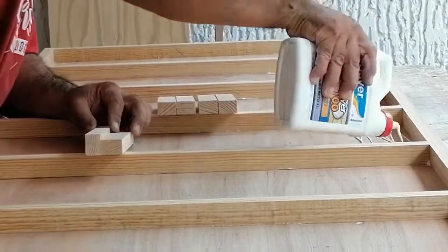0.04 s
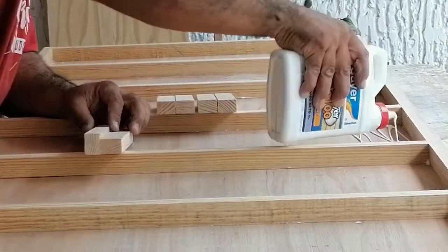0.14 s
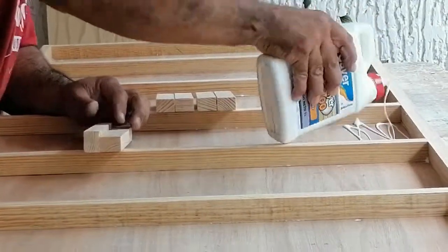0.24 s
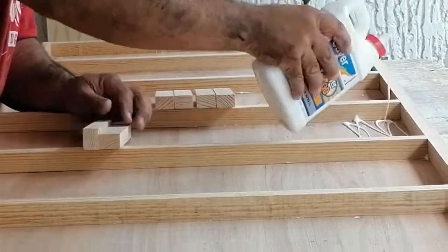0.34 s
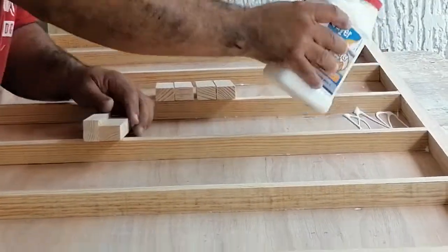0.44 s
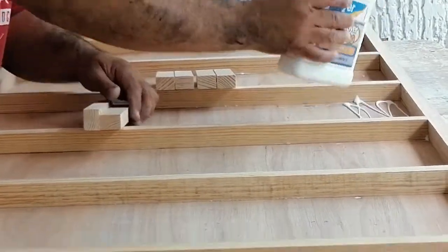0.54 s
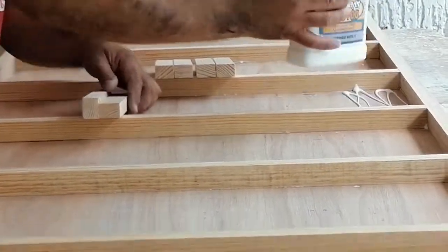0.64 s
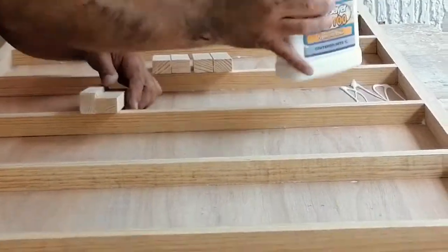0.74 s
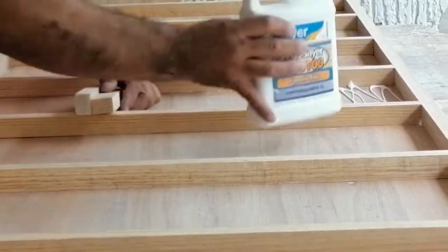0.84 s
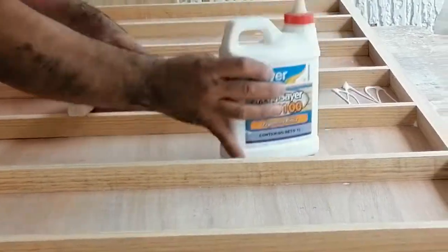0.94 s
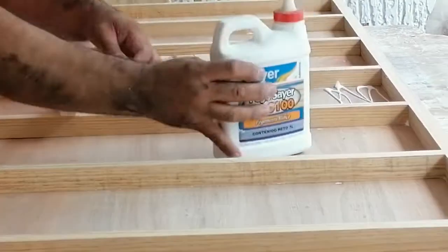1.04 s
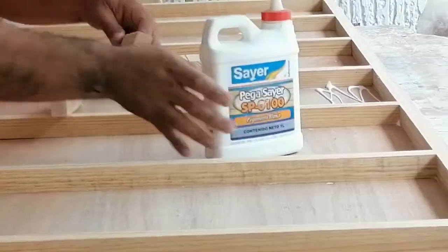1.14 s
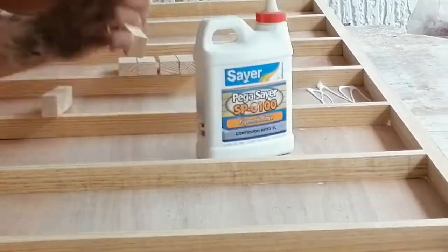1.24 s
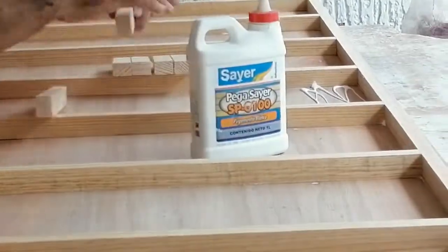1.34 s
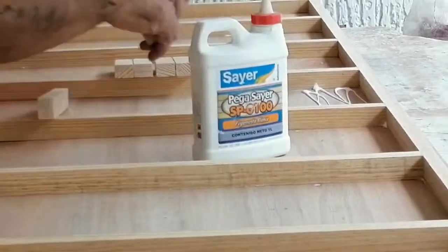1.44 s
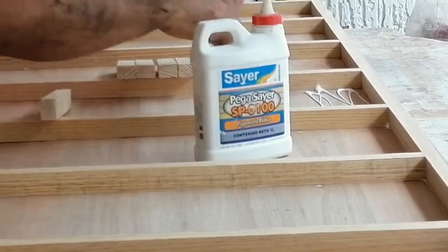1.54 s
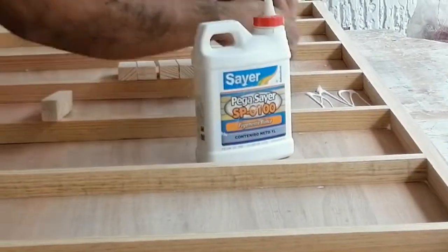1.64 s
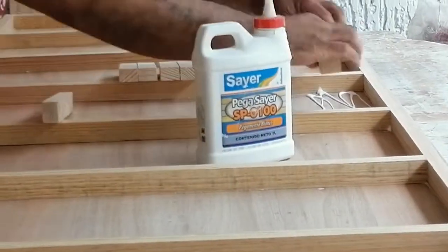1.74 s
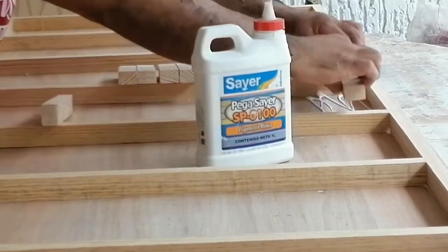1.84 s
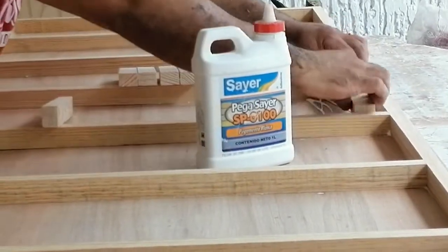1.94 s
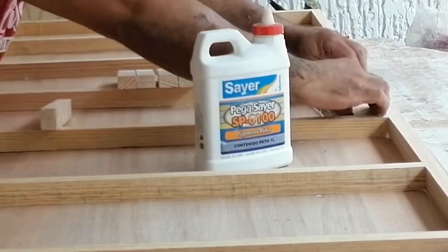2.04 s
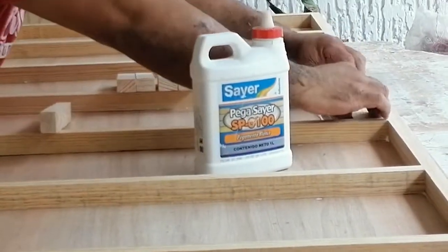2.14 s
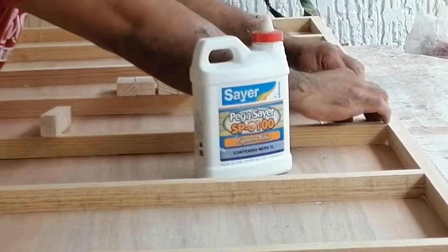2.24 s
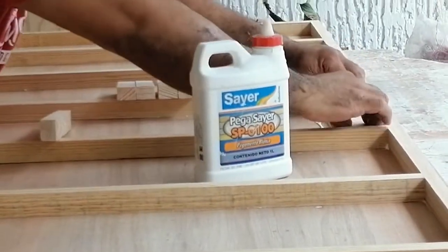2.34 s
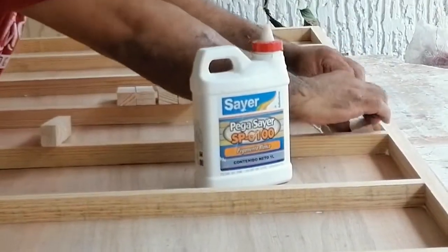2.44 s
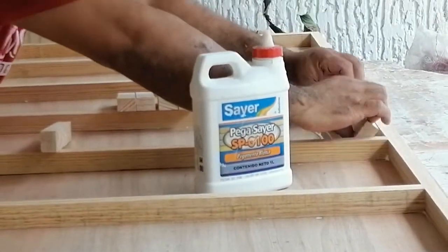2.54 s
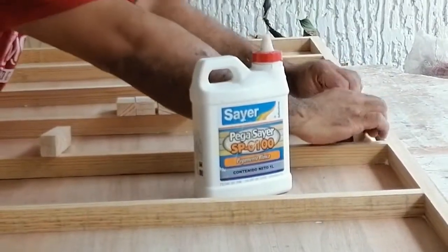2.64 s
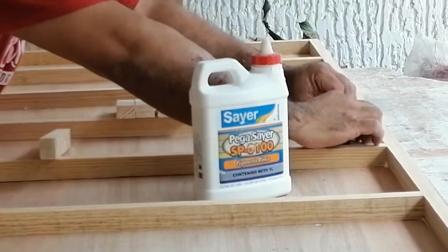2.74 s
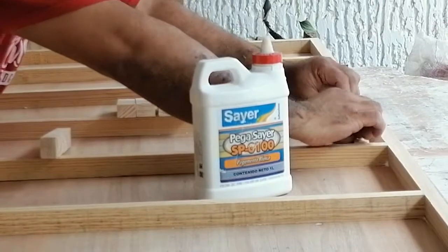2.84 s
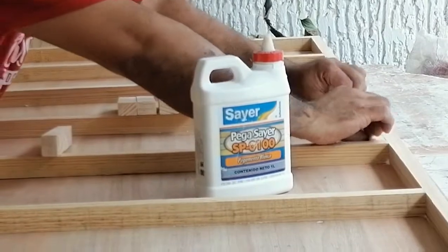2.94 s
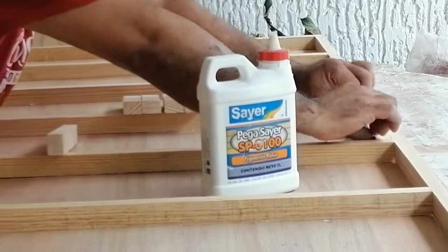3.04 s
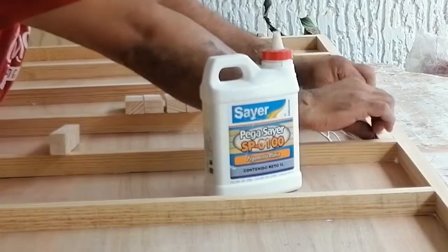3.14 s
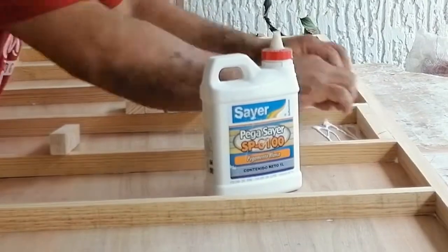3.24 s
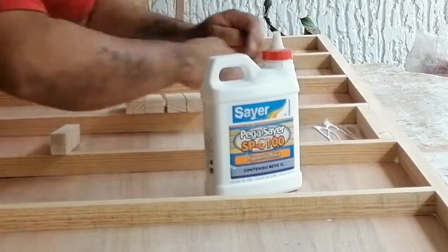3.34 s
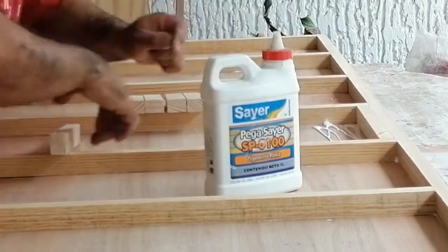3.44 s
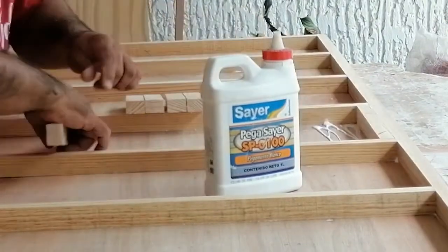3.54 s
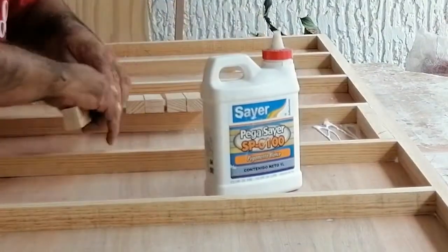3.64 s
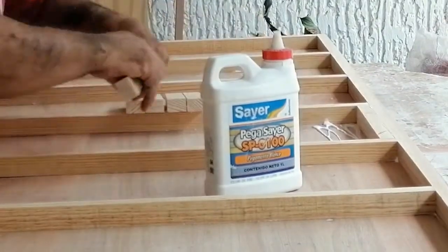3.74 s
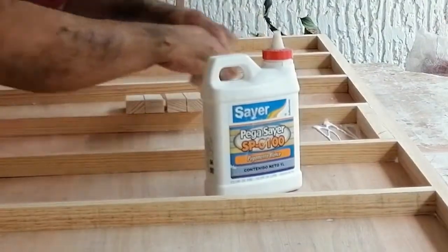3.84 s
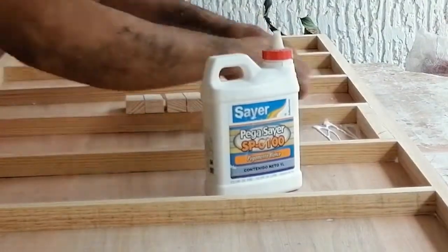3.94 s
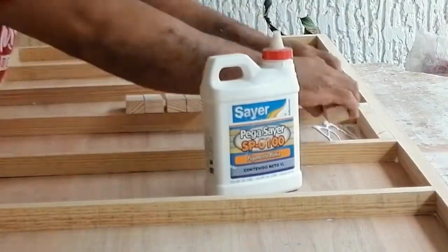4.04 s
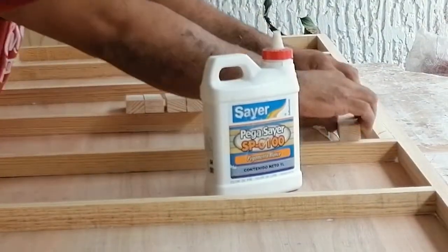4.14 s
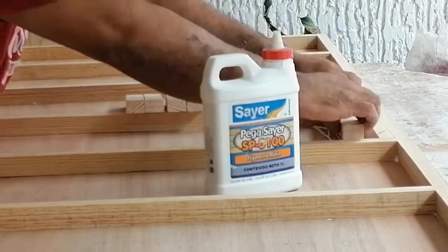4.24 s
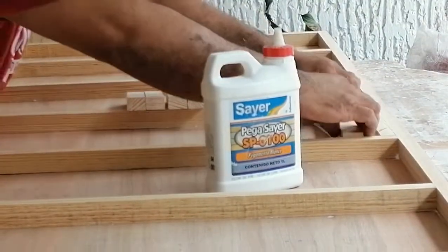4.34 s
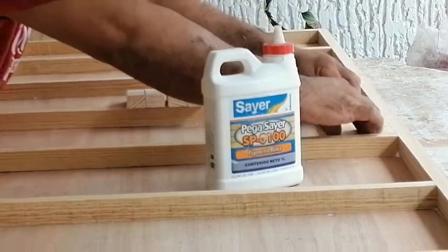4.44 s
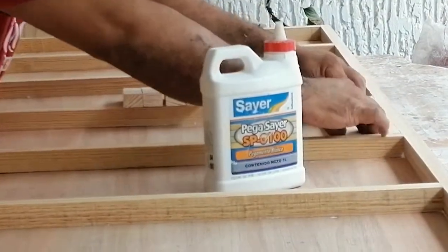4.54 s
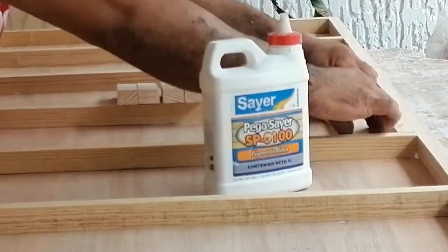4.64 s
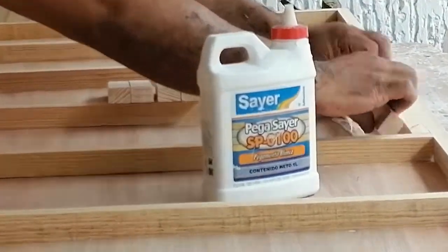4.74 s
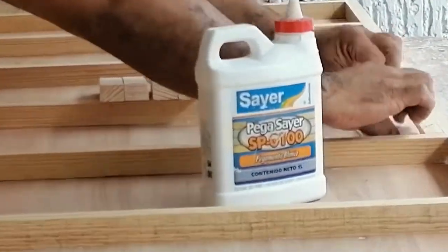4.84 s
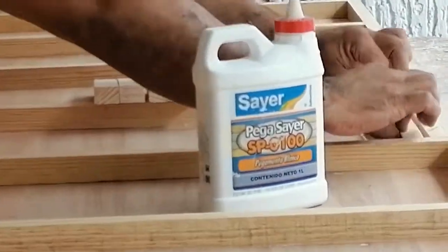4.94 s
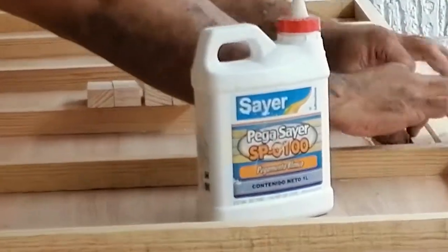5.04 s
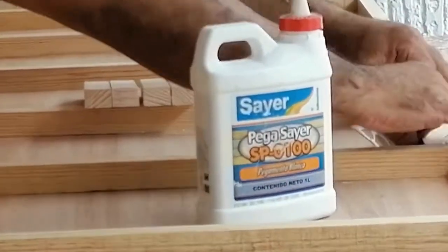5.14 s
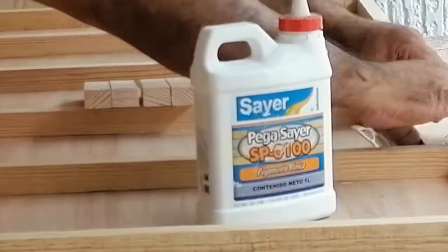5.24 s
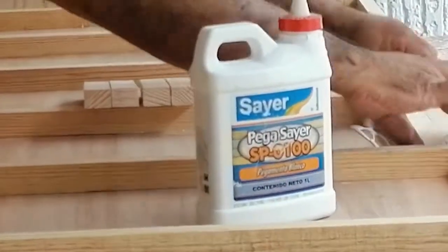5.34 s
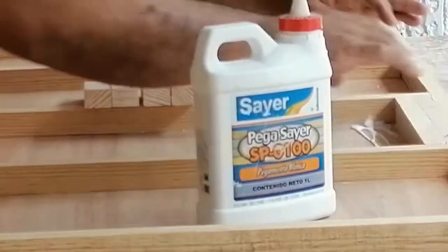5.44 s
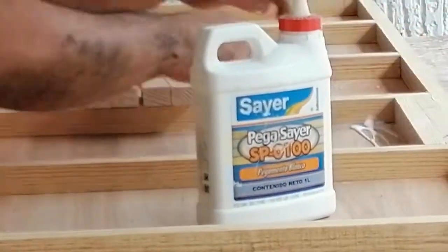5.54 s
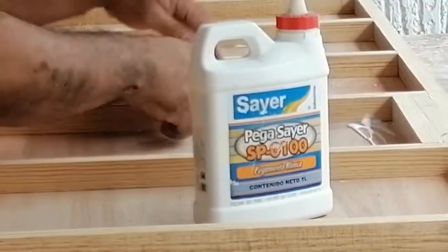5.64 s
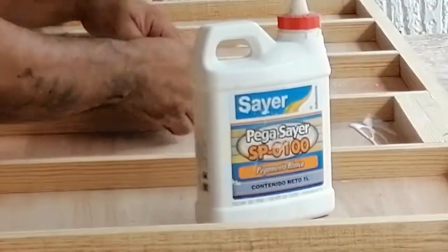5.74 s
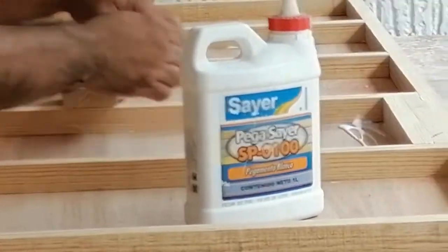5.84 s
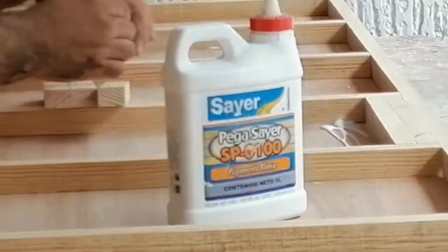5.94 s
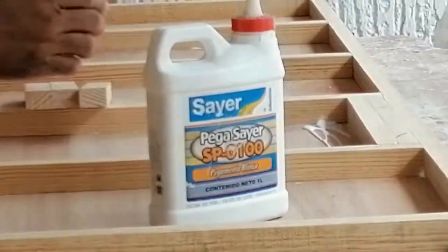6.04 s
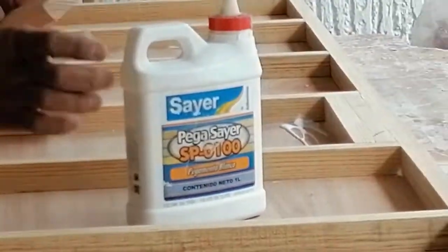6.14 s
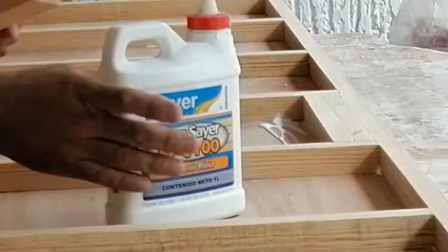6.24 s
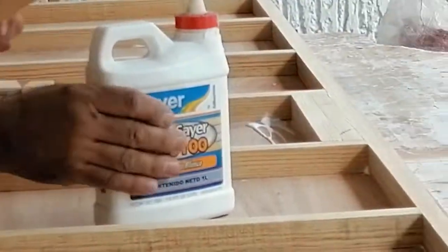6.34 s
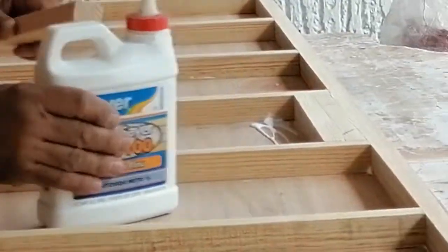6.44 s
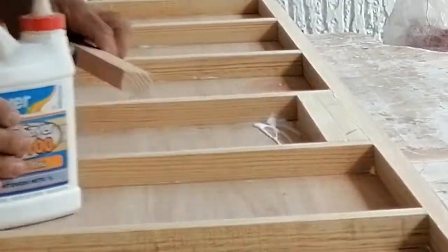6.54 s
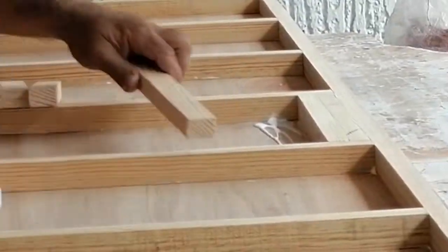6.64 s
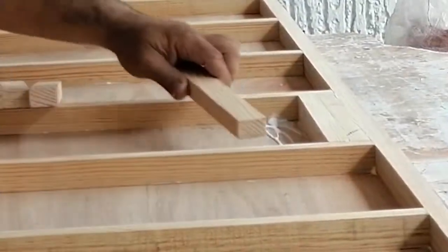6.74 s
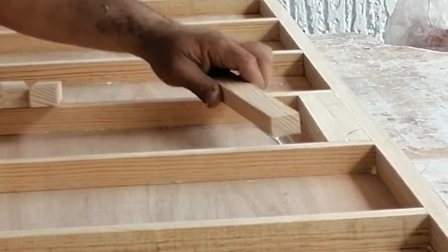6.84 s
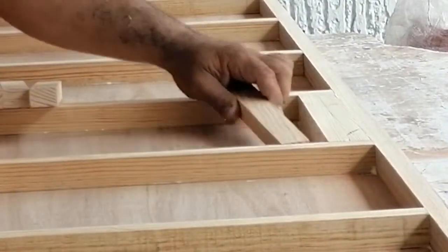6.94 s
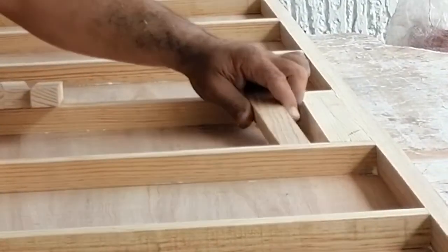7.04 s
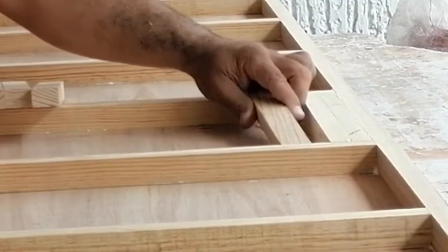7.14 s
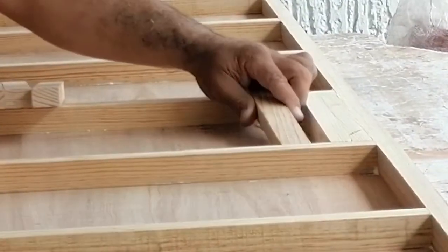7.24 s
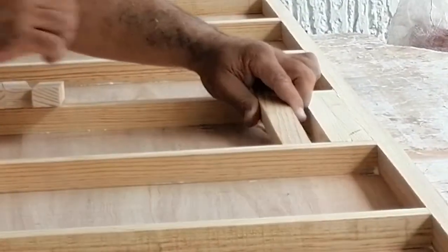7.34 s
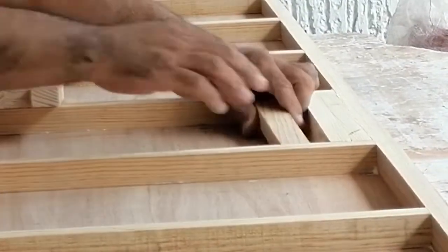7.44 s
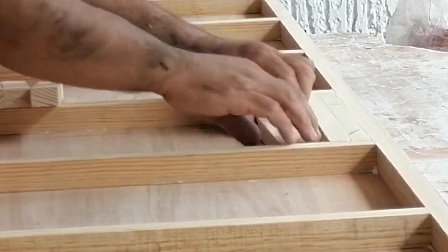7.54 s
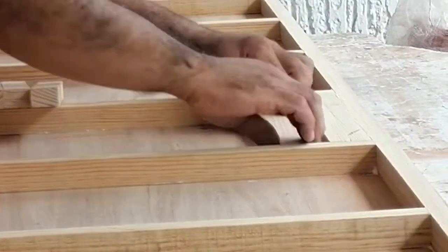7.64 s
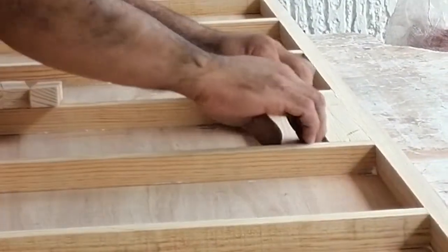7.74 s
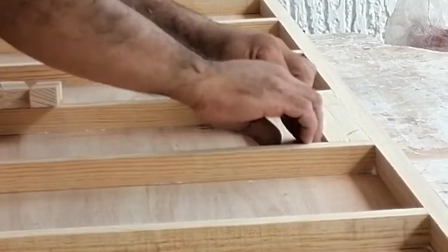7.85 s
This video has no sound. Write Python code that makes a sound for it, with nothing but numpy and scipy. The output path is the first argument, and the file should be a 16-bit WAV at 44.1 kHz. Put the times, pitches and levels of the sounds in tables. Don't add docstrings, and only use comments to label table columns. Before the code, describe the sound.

In a bare, reverberant workshop, a close microphone catches small wooden blocks and a plastic glue bottle being set on a plywood frame. A knock opens, a duller thud follows as the bottle lands, then scattered clacks and light hand strokes. The loudest knocks come at the middle and just after six seconds, followed by a scraping drag of the bottle and one last knock. Traffic rumbles low and an idling engine swells outside.

```python
import sys
import numpy as np
from scipy import signal
from scipy.fft import rfft, irfft
from scipy.io import wavfile
from scipy.ndimage import uniform_filter1d

SR = 44100
rng = np.random.default_rng(int(sys.argv[2]) if len(sys.argv) > 2 else 0)


def waveform_to_disk(signal):
    frames = np.transpose(np.atleast_2d(signal))
    scaled = np.clip(frames, -1, 1) * 32767
    samples = np.round(scaled).astype(np.int16)
    wavfile.write(sys.argv[1], SR, samples)


def how_loud(loudness_db):
    steps = np.asarray(loudness_db, float) / 20
    return 10 ** steps


N = 347949

# start_s, blow_db, contact_ms, bench_ring_db, direct_db (against the room)
KNOCK_EVENTS = [(.333, -25.5, 0.64, -3.5, -6), (.51, -58.5, 0.22, -20, 1), (1.119, -29, 1.5, -14.5, -4.5),
                (1.4, -49.5, 0.58, 2, -27), (2.084, -34, 0.46, 6.5, -8), (2.19, -46, 1.8, -11, -5),
                (2.58, -66, .5, -20, -15), (2.779, -39.5, 1.57, -4, -1.5), (2.793, -30, 2.34, -1.5, -1),
                (2.885, -37, 1.7, 4.5, -3), (3.686, -49, 1.6, 7.5, 0), (4.305, -34.5, 0.87, -3, -8),
                (5.005, -47, 1.23, -14, -4), (5.028, -22, 1.2, 0, -6.5), (5.308, -37, 2.3, -4, -7.5),
                (5.95, -32.5, 2.65, 2, -20), (6.049, -39, 2, -8, -2), (6.109, -21, 0.32, 2, -8.5),
                (7.186, -31.5, 0.94, 1.5, -7), (7.72, -53, 1, 53, 6.5), (1.198, -38, 3, 10.5, -5.5),
                (5.037, -32.5, 0.38, -14, -17)]
KNOCK_PIECE = [0, 1, 2, 0, 3, 7, 1, 4, 5, 5, 6, 7, 13, 8, 9, 10, 11, 12, 13, 0, 5, 9]
# thud_hz, thud_db, ring_hz, overtone_hz, overtone_db
PIECE_BODIES = [(252, 17, 693, 1400, -32), (260, -50, 5800, 2000, -16), (194, 13, 730, 1030, -5),
                (203.1, -21, 1030, 2300, -22), (300, -25, 700, 1590, 5), (277, 11, 710, 1910, -9.5),
                (148, 7.5, 545, 1310, -1), (337, 3, 1010, 2260, -28), (293, 1.5, 716, 1014, -1.5),
                (394, -0.5, 740, 1130, -4), (306, 5.5, 770, 1510, 1.5), (300, -4, 600, 1460, 3.5),
                (282, -6.5, 746, 1240, -14), (265, 9, 706, 1007, 2.5)]
# rolloff_db_per_oct, top_edge_hz, tick_hz, tick_db (against the ring)
PIECE_TOUCHES = [(12.5, 11500, 6760, -22.5), (9, 9600, 7400, 2), (3.5, 7350, 5900, -7.5),
                 (19.5, 2300, 6800, -58), (8, 8100, 3700, -28), (11, 8800, 7400, -34),
                 (4.5, 12000, 6400, 0), (22.5, 4200, 6800, -62), (6, 7900, 3160, -11),
                 (3, 2360, 5800, -26.5), (4.5, 6900, 2090, 2), (7.5, 3300, 3700, -33),
                 (12.5, 8300, 7100, -37.5), (12.5, 1500, 6800, -60)]
# mode_hz, gain_db, t60_s
BENCH_MODES = [(148.9, 9, 0.27), (234.4, -2.5, 0.55), (267.7, 1.5, 0.27), (370, -23.5, 0.21),
               (698, -0.5, 0.17), (749, -2.5, 0.55), (943, -1.5, 0.042), (1543, -4, 0.024)]
THUD_OCT, RING_OCT, TICK_OCT = 0.43, 0.16, 0.084
SHAKE_HZ, SHAKE_OCT, SHAKE_DB = 144, 0.17, -3.5
LOW_EDGE_HZ, EDGE_DB_PER_OCT = 123, 35.5
SKIRT_DB, BELOW_DB_PER_OCT = 0, 2.5

# start_s, rise_s, fall_s, hiss_db, body_db (against the hiss)
STROKES = [
    (.513, .004, 0.27, -51.5, -22),
    (2.585, .015, 0.33, -60.5, 0.5),
    (3.06, 0.18, 0.13, -46.5, -16),
    (3.684, 0.0017, 0.081, -47, -20),
    (7.66, 0.032, .06, -60.5, 0),
    (3.205, .01, .1, -48, -13),
]
# time_s, hiss_db, body_db (against the hiss)
BOTTLE_DRAG = [
    (6.54, -68, 4),
    (6.56, -49.5, -8),
    (6.61, -39.5, -6),
    (6.68, -36.5, -12),
    (6.73, -35.5, -5.5),
    (6.82, -39, -5),
    (6.908, -52.5, 6),
    (7.006, -93, -22),
    (7.04, -88, 3),
]
# freq_hz, density_db_per_hz
GRAIN_HISS = [(2120, -24), (3600, -13.5), (4310, -10.5), (5010, -7), (5820, -2), (7110, -2.5),
              (8790, -11.5), (13400, -27.5), (14800, -25), (16000, -35)]
# freq_hz, density_db_per_hz
HOLLOW_BODY = [(290, -8), (500, -20.5), (794, -7), (876, -2), (1020, -4.5), (1750, 0), (2270, -5),
               (3220, -3), (4200, -23), (5460, -16), (9240, -120)]
RISE_DB, FALL_DB = -36, -41
BODY_STAYS = 0.48

# start_s, length_s, pitch_hz, first_db, last_db
SKIN_SQUEAKS = [
    (2.76, .19, 4460, -69, -70),
    (4.995, .03, 7130, -70, -60),
]

# start_s, length_s, top_hz, top_after_s, level_db
BIRD_PEEPS = [
    (1.0, .05, 9980, .045, -85),
    (1.46, .11, 9500, 0.063, -74.5),
    (1.865, 0.11, 10600, 0.0021, -83),
]
DROOP_HZ, DROOP_S, DROOP_BEND, PEEP_ENDS_DB = 480, 0.04, 1.5, -12

# freq_hz, t60_s
ROOM_T60 = [(100, 0.67), (260, 0.59), (700, 0.45), (1840, 0.53), (4850, 0.49)]
# freq_hz, likeness
ROOM_LIKENESS = [(100, 0.82), (300, 0.93), (700, 0.39), (1500, 0.045), (4000, 0.044), (15000, 0.018)]
# freq_hz, gain_db
MIC_PORT = [(20, -2), (3300, 0.5), (4000, -1), (4700, 1), (6500, -1), (7250, 4.5), (7900, -4.5), (15500, 2),
            (16100, -37)]
LEFT_LAG_SAMPLES = 5

# centre_s, width_s, swell_db
WHEEL_GUSTS = [
    (.85, 0.033, 9),
    (1.68, 0.062, 14),
    (2.27, 0.18, 11.5),
    (4.1, 0.1, 5),
    (5.48, 0.21, 10),
    (6.95, 0.05, 13.5),
    (7.38, 0.089, 5.5),
]
# time_s, nearness_db
ENGINE_NEARNESS = [(0, 7), (.6, -5.5), (1.3, 2), (2.4, -5.5), (3.0, -4), (3.7, 7.5), (4.3, 3), (4.7, 9.5),
                   (5.1, 4.5), (5.5, 4.5), (6.0, 12.5), (6.7, 5.5), (6.95, 10.5), (7.2, 7), (7.89, 4)]
DEEP_DB, DRONE_DB, HUM_DB, ROAR_DB = -52.5, -56.5, -67, -66
DRONE_HZ, HUM_FOLLOWS, ROAR_FOLLOWS = 84.25, 1.01, 0.77

# freq_hz, density_db_per_hz
AIR_WASH = [(65, -36.5), (110, -6.5), (163, -6), (199, -8.5), (301, -15), (414, -18), (597, -15.5),
            (786, -19), (958, -17), (1100, -20), (1320, -25.5), (3500, -36), (4000, -39), (5460, -64.5),
            (9240, -120)]
# freq_hz, likeness
AIR_LIKENESS = [(60, 0.26), (180, 0.96), (550, 0.34), (1650, -0.33), (4970, 0.04), (15000, 4)]
# freq_hz, density_db_per_hz
AIR_FIZZ = [(2470, -30), (4150, -19), (4570, -4.5), (5080, -4.5), (5640, -5.5), (7050, -1), (9310, -20),
            (10100, -17.5), (13000, -20), (15000, -15.5), (15900, -53)]
# centre_s, width_s, swell_db
FIZZ_SWELLS = [
    (1.0, 1, 4.5),
    (3.5, 1, 3.5),
]
AIR_DB, FIZZ_DB = -54, -75


def knock(row, piece, spread_db=32):
    blow_db, contact_ms, ring_db = row[1:4]
    t = np.arange(SR // 2) / SR
    contact = chatter(np.clip(contact_ms, .05, 12), size=len(t))
    struck = signal.fftconvolve(contact, causal(piece))[:len(t)]
    hz, db, t60 = np.transpose(BENCH_MODES)[..., None]
    peak_scale = 2 * np.log(1000) / (t60 * SR)
    modes = how_loud(ring_db + 1.5 + db - 60 * t / t60) * np.sin(2 * np.pi * hz * t) * peak_scale
    bench = modes.sum(0)
    bench[0] = 1
    sound = signal.fftconvolve(struck, bench)[:len(t)]
    return how_loud(blow_db + spread_db) * sound / np.linalg.norm(sound)


def chatter(contact_ms, size, bounce=0.58):
    x = np.zeros(size)
    x[0] = 1
    gaps = 1 + (contact_ms * SR / 1000 * rng.uniform(.1, 1, 4)).astype(int)
    for gap in gaps:
        taps = np.zeros(gap + 1)
        taps[[0, -1]] = 1, bounce
        x = signal.lfilter(taps[::-1], taps, x)
    return x


def colour(thud_hz, thud_db, ring_hz, over_hz, over_db, fall_db, top_hz, tick_hz, tick_db):
    hz = np.geomspace(30, 22050, 240)
    lobes = [(thud_db, thud_hz, THUD_OCT), (thud_db + SHAKE_DB, SHAKE_HZ, SHAKE_OCT), (0, ring_hz, RING_OCT),
             (over_db, over_hz, RING_OCT), (tick_db, tick_hz, TICK_OCT)]
    above_oct = np.log2(hz / ring_hz)
    gain = how_loud(SKIRT_DB - np.maximum(fall_db * above_oct, -BELOW_DB_PER_OCT * above_oct))
    for db, centre_hz, width_oct in lobes:
        gain = gain + how_loud(db - 7.37 * (np.log2(hz / centre_hz) / width_oct) ** 2)
    outside_oct = np.maximum(np.log2(hz / top_hz), np.log2(LOW_EDGE_HZ / hz))
    outside_oct = np.maximum(outside_oct, 0)
    return np.transpose([hz, 20 * np.log10(gain) - EDGE_DB_PER_OCT * outside_oct])


def rub(rows, slips_per_s=5000, uneven_db=3.0):
    s, hiss_db, body_db = np.transpose(rows)
    t = np.arange(s[0], s[-1], 1 / SR)
    slips = rng.standard_normal(len(t)) * (rng.random(len(t)) < slips_per_s / SR)
    unevenness = evened(uniform_filter1d(rng.standard_normal(len(t)), 300))
    slips *= how_loud(uneven_db * unevenness)
    body = how_loud(np.interp(t, s, body_db)) * coloured(slips, HOLLOW_BODY)
    mix = coloured(slips, GRAIN_HISS) + body
    return how_loud(np.interp(t, s, hiss_db)) * mix * signal.windows.tukey(len(t), .08)


def stroke(start, rise, fall, hiss_db, body_db):
    drop_db = np.array([RISE_DB, 0, FALL_DB])
    time_s = start + np.cumsum([0, rise, fall])
    return np.transpose([time_s, hiss_db + drop_db, body_db - BODY_STAYS * drop_db])


def squeak(start, length, hz, first_db, last_db, width_hz=60):
    u = np.arange(0, length, 1 / SR) / length
    level = how_loud(first_db + (last_db - first_db) * u)
    return level * fuzzy(hz + 0 * u, width_hz) * signal.windows.tukey(len(u), .3)


def peep(start, length, top_hz, top_s, db):
    t = np.arange(0, length, 1 / SR)
    hz = top_hz - DROOP_HZ * (abs(t - top_s) / DROOP_S) ** DROOP_BEND
    tone = np.sqrt(2) * np.sin(2 * np.pi * np.cumsum(hz) / SR)
    level = how_loud(db + PEEP_ENDS_DB * (2 * t / length - 1) ** 2)
    return level * tone * signal.windows.tukey(len(t), .3)


def room_tail(gap_s=0.00089, build_s=0.00042, knee_s=0.42, cut_db=8, early_db=3, early_s=0.0058):
    t = np.arange(SR) / SR
    build = 1 - np.exp(-np.maximum(t - gap_s, 0) / build_s)
    taps = paired(*rng.standard_normal((2, SR)), ROOM_LIKENESS) * build
    hz, frame_s, z = signal.stft(taps, SR, nperseg=512)
    decay = how_loud(-60 * frame_s / read(ROOM_T60, hz)[:, None])
    tail = signal.istft(z * decay, SR, nperseg=512)[1][:, :SR]
    tail = tail * (t > gap_s) * how_loud(early_db * np.exp(-t / early_s) - cut_db * (t / knee_s) ** 4)
    return tail / np.linalg.norm(tail, axis=1)[:, None]


def heard(x, tail, direct_db):
    x = np.pad(x, (0, SR))
    direct = np.array([np.roll(x, LEFT_LAG_SAMPLES), x])
    return how_loud(direct_db) * direct + signal.fftconvolve(x[None], tail, axes=1)[:, :len(x)]


def traffic(drone_width_hz=7, drone_share=0.71, hum_hz=131):
    t = np.arange(N) / SR
    near_db = np.interp(t, *np.transpose(ENGINE_NEARNESS))
    deep_db = DEEP_DB + swells(WHEEL_GUSTS)
    drone_db = DRONE_DB + near_db
    a, b, c, d = rng.standard_normal((4, N))
    likeness = [(20, 1.0), (200, 0.56)]
    deep = evened(band(band(paired(a, b, likeness), 25, 55.5), 26.7, 76))
    wide = evened(band(band(paired(c, d, likeness), 72, 129.5), 59.6, 130))
    narrow = fuzzy(DRONE_HZ + 0 * t, drone_width_hz)
    drone = evened(drone_share * narrow + (1 - drone_share) * wide)
    hum = how_loud(HUM_DB + HUM_FOLLOWS * near_db) * fuzzy(hum_hz + 0 * t, width_hz=3.9)
    roar = evened(band(band(paired(d, a, likeness), 154, 310), 140, 366))
    roar = how_loud(ROAR_DB + ROAR_FOLLOWS * near_db) * roar
    balance = how_loud([[.8], [-.8]])
    return balance * (how_loud(deep_db) * deep + how_loud(drone_db) * drone) + hum + roar


def air(patchy_db=-2.15):
    left, right = [coloured(rng.standard_normal(N), AIR_WASH) for _ in range(2)]
    wash = how_loud(AIR_DB) * paired(left, right, AIR_LIKENESS)
    fizz = np.array([coloured(rng.standard_normal(N), AIR_FIZZ) for _ in range(2)])
    wash += how_loud(FIZZ_DB + swells(FIZZ_SWELLS)) * fizz
    z = signal.stft(wash, nperseg=1024)[2]
    patches = uniform_filter1d(rng.standard_normal(z.shape[1:]), 16, 0)
    patches = evened(uniform_filter1d(patches, 12, 1))
    return how_loud(1.0) * signal.istft(z * how_loud(patchy_db * patches), nperseg=1024)[1][:, :N]


def swells(events):
    t = np.arange(N) / SR
    return sum(db * np.exp(-((t - s) / width) ** 2) for s, width, db in events)


def fuzzy(hz, width_hz):
    a, b = rng.standard_normal((2, len(hz)))
    slow = signal.lfilter([1], [1, -np.exp(-np.pi * width_hz / SR)], a + 1j * b)
    return evened((slow * np.exp(2j * np.pi * np.cumsum(hz) / SR)).real)


def causal(points):
    hz = abs(np.fft.fftfreq(8192, 1 / SR))
    log_gain = np.log(how_loud(np.maximum(read(points, hz), -90)))
    pulse = np.fft.ifft(np.exp(signal.hilbert(log_gain).conj())).real[:4096]
    return pulse / np.linalg.norm(pulse)


def coloured(x, points):
    gain = how_loud(read(points, np.fft.rfftfreq(len(x), 1 / SR)))
    return evened(irfft(rfft(x) * gain, len(x)))


def paired(a, b, likeness):
    same = np.clip(read(likeness, np.fft.rfftfreq(len(a), 1 / SR)), -1, 1)
    return np.array([a, irfft(same * rfft(a) + np.sqrt(1 - same ** 2) * rfft(b), len(a))])


def band(x, lo_hz, hi_hz):
    return signal.sosfilt(signal.butter(2, [lo_hz, hi_hz], "band", fs=SR, output="sos"), x)


def evened(x):
    return x / np.sqrt(np.mean(x ** 2) + 1e-20)


def read(points, hz):
    f, value = np.transpose(points)
    return np.interp(np.log(hz + 1), np.log(f + 1), value)


def add(mix, s, sound):
    part = mix[..., round(s * SR):][..., :sound.shape[-1]]
    part += sound[..., :part.shape[-1]]


def scene():
    near = np.zeros((2, N))
    tails = [room_tail() for _ in range(5)]
    for k, row in enumerate(KNOCK_EVENTS):
        piece = KNOCK_PIECE[k]
        spectrum = colour(*PIECE_BODIES[piece], *PIECE_TOUCHES[piece])
        add(near, row[0], heard(knock(row, spectrum), tails[k % 5], direct_db=row[4]))
    rubs = [stroke(*row) for row in STROKES] + [BOTTLE_DRAG]
    for k, rows in enumerate(rubs):
        add(near, rows[0][0], how_loud(-2.0) * heard(rub(rows), tails[k % 5], direct_db=-5))
    for row in SKIN_SQUEAKS:
        add(near, row[0], heard(squeak(*row), how_loud(-6) * tails[1], direct_db=6))
    for row in BIRD_PEEPS:
        add(near, row[0], how_loud(-2.5) * heard(peep(*row), how_loud(2) * tails[0], direct_db=4))
    port = causal(MIC_PORT)[None]
    near = how_loud(-1.0) * signal.oaconvolve(near, port, axes=1)[:, :N]
    return near + air() + traffic()


def top_cut(x):
    return signal.sosfilt(signal.butter(12, 16360, fs=SR, output="sos"), x)


def record(dry):
    return top_cut(dry)


dry = scene()
out = record(dry)
waveform_to_disk(out)
```